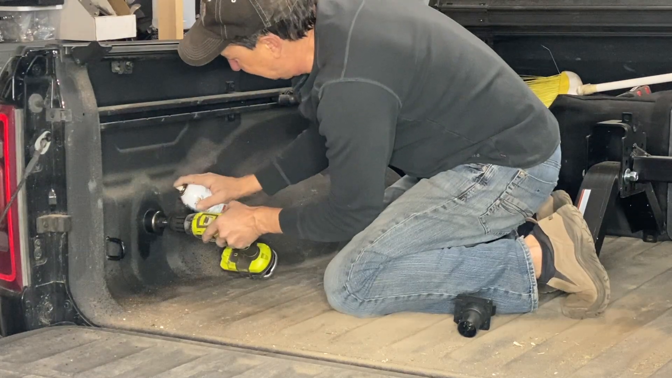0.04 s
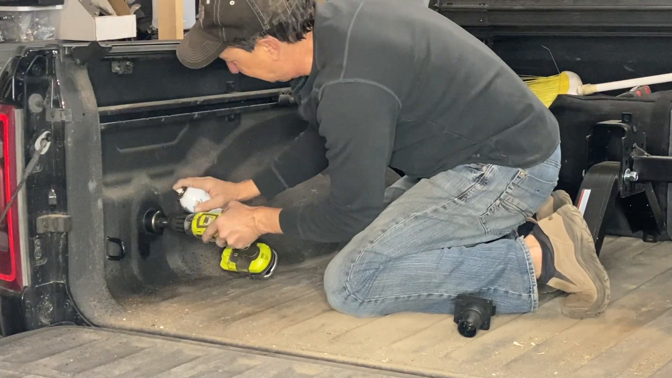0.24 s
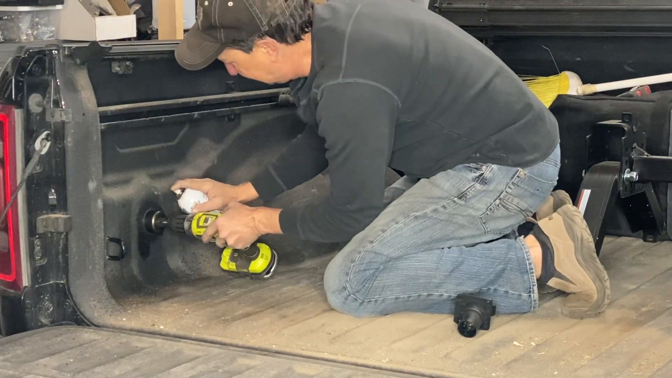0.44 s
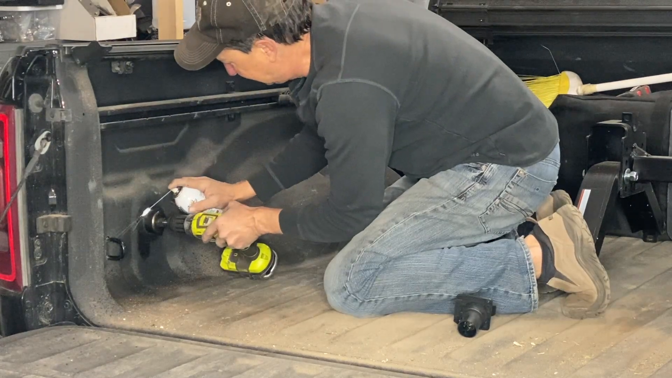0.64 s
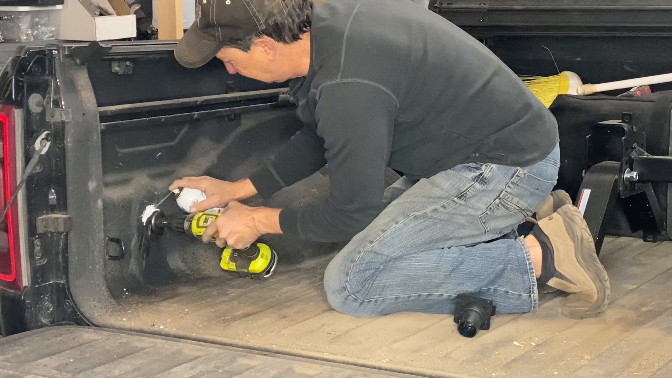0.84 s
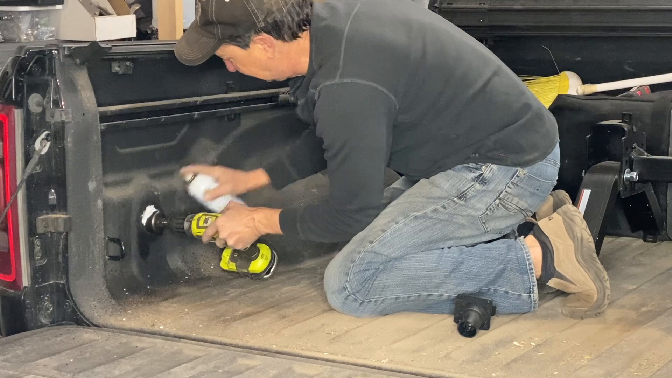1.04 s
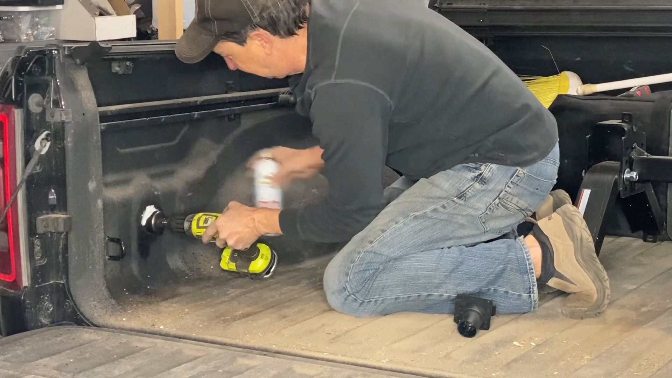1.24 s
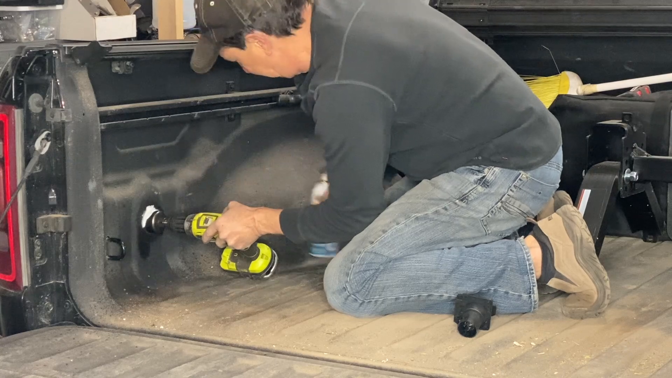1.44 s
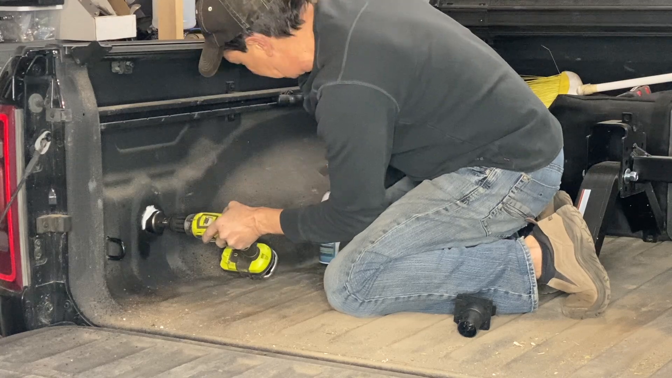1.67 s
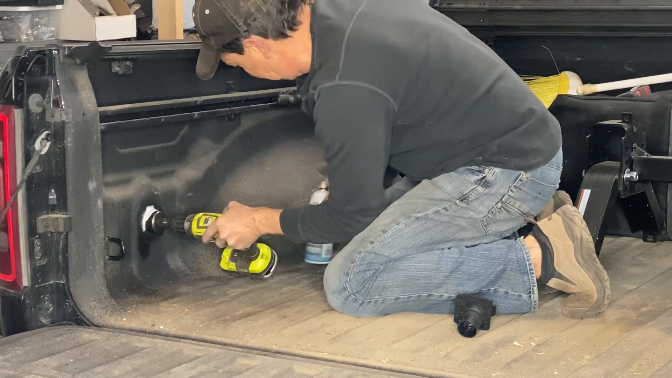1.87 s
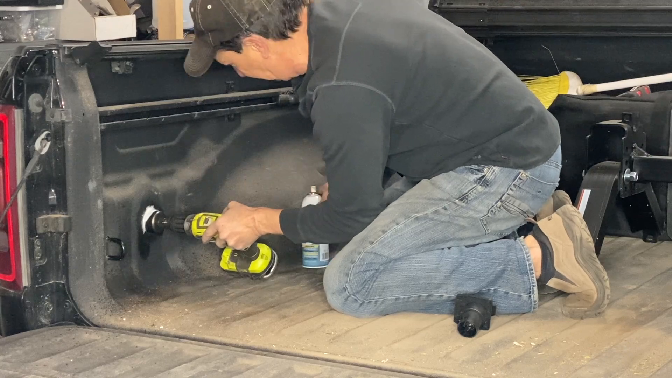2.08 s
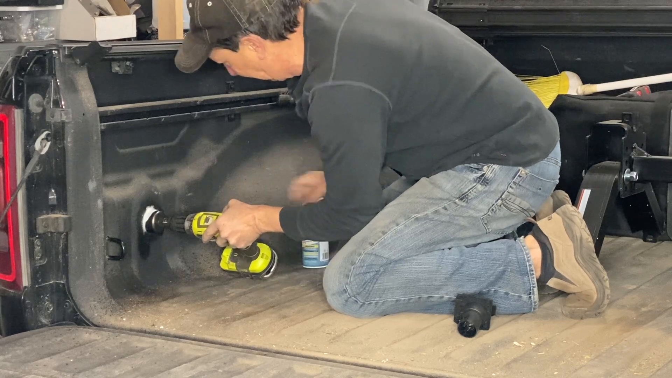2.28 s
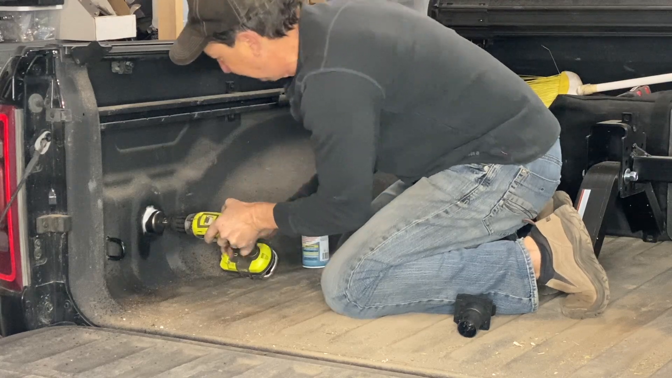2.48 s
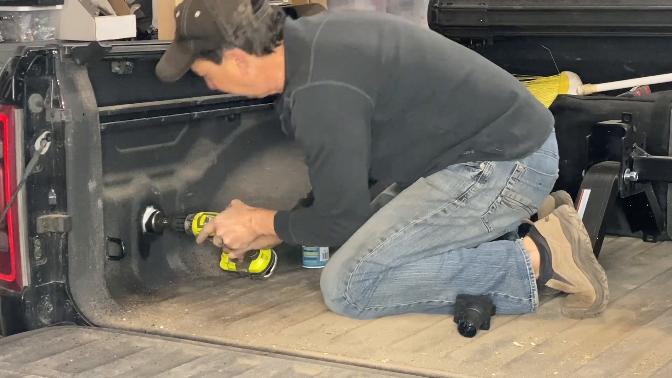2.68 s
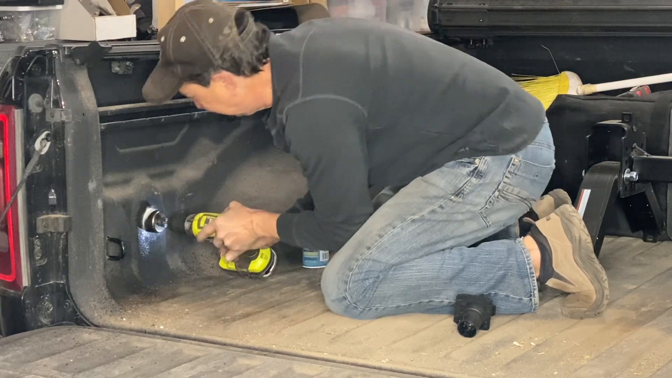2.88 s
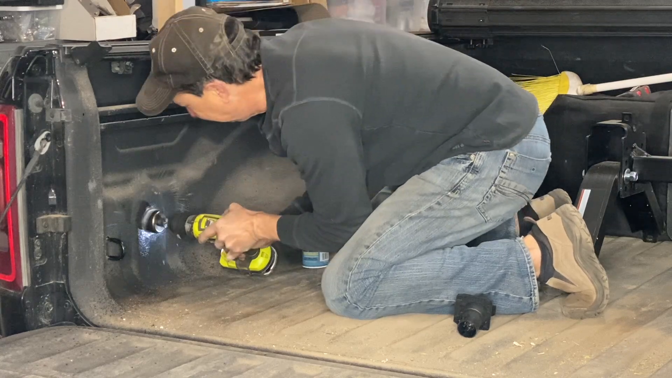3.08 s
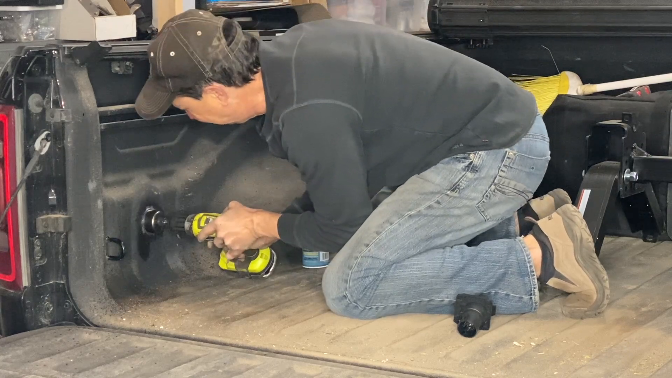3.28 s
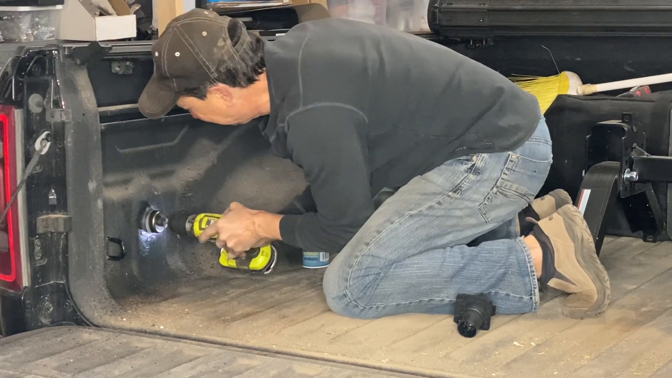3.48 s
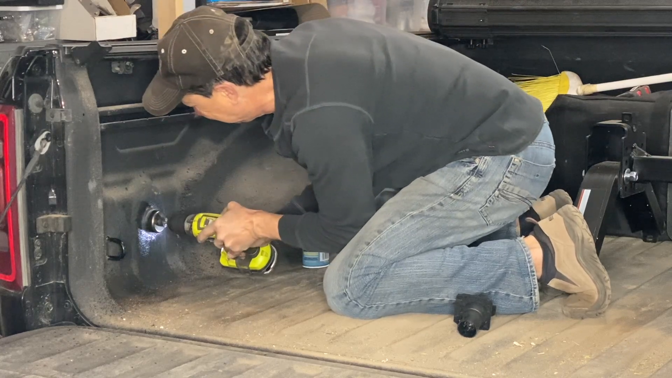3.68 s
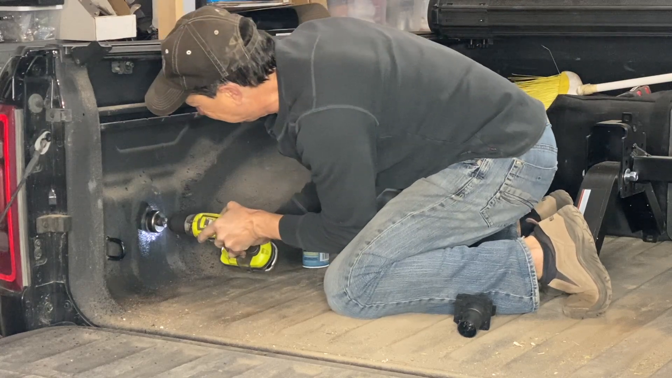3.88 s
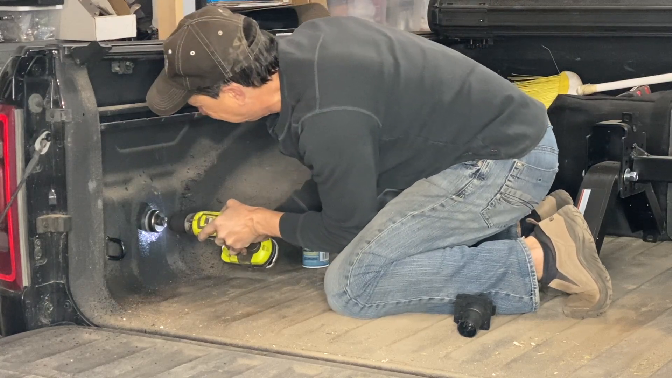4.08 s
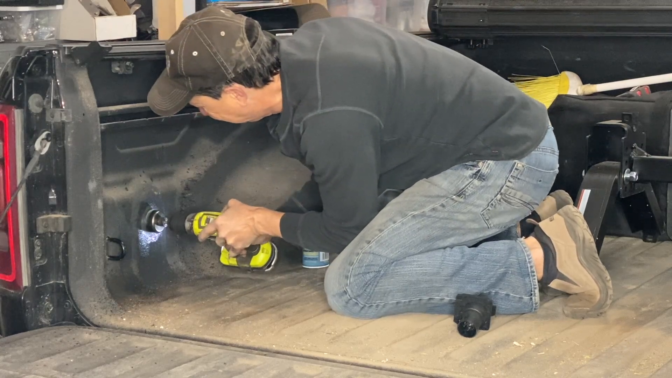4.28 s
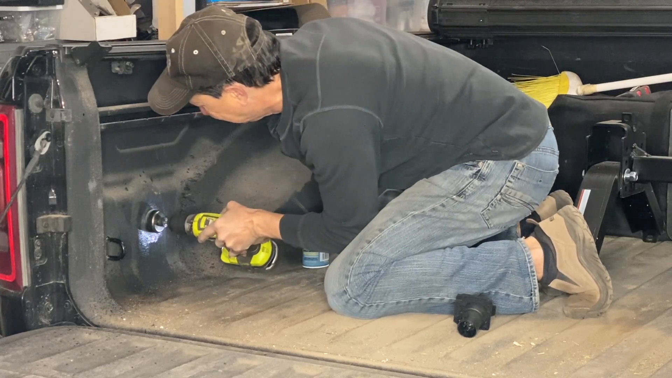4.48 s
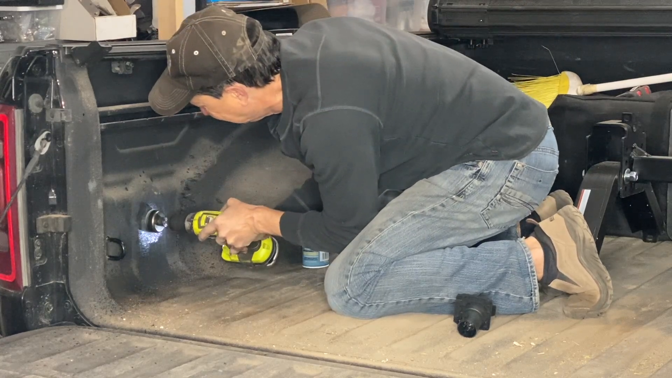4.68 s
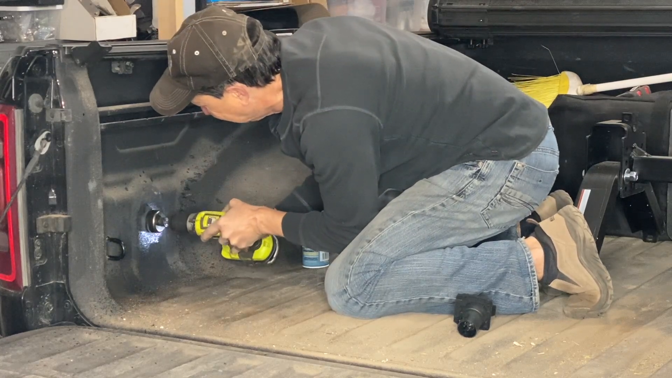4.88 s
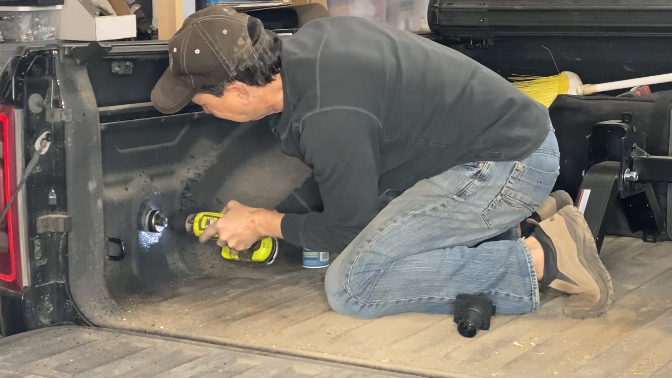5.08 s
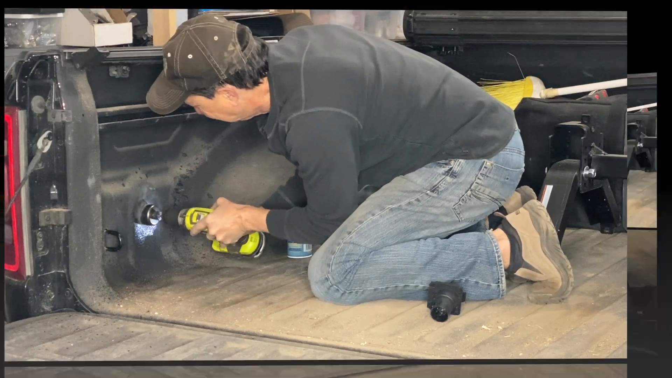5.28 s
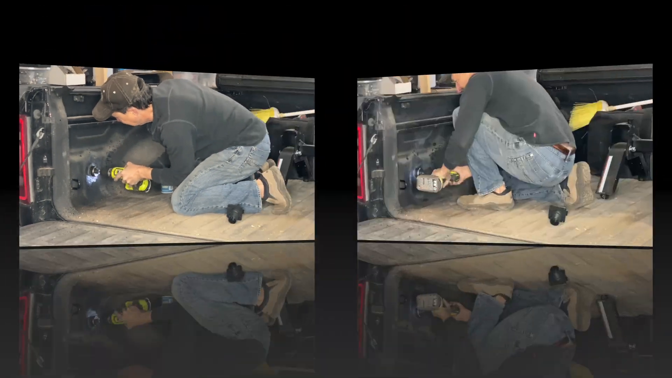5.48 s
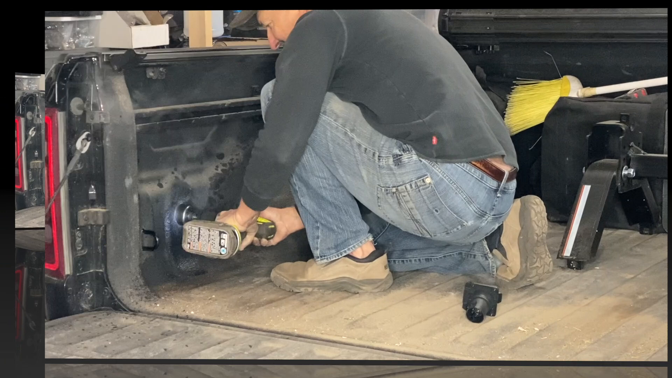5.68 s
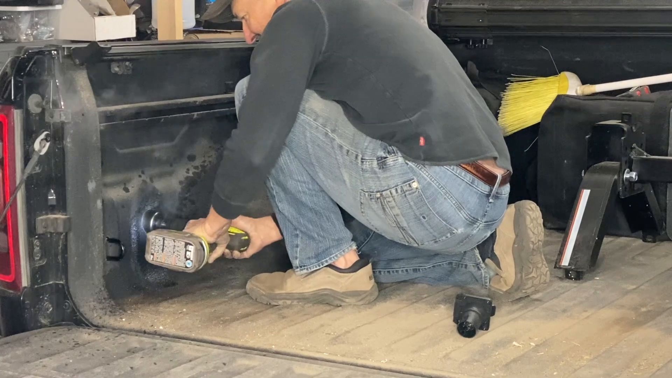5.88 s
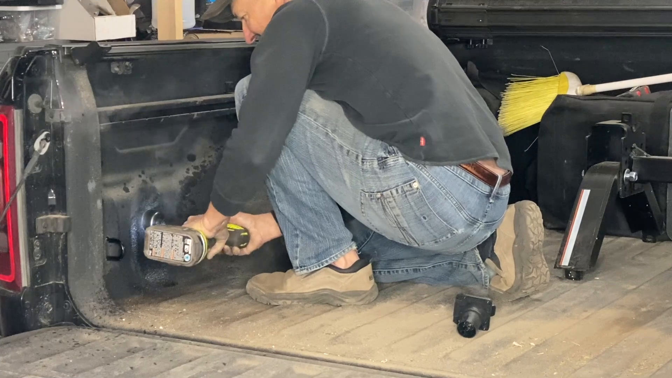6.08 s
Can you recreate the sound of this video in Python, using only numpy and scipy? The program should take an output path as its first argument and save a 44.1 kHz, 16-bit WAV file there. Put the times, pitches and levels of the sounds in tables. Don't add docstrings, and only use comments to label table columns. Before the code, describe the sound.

In a garage, someone kneeling in a pickup bed shifts with dull thumps, gives one bright spray burst, and sets the can down with a hollow metallic clunk. Cloth rustles, a knock follows, then a drill-driven hole saw bites steel close to the microphone, rasping, booming and ringing, with one brief let-off. The cut continues unevenly, then changes abruptly to a brighter, steadier buzzing howl.

```python
import sys
import numpy as np
from scipy import signal
from scipy.fft import rfft, irfft, next_fast_len
from scipy.io import wavfile

SR = 44100
rng = np.random.default_rng(int(sys.argv[2]) if len(sys.argv) > 2 else 0)


def inscribe(sig):
    pcm = np.round(np.clip(np.atleast_2d(sig).T, -1, 1) * 32767)
    wavfile.write(sys.argv[1], SR, pcm.astype(np.int16))


def voltage_ratio(level):
    return 10 ** (np.asarray(level, float) / 20)


N = 270333
SIZE = next_fast_len(N + SR)
HZ = np.maximum(np.fft.rfftfreq(SIZE, 1 / SR), 1)
TIME = np.arange(N) / SR
DISSOLVE_S, DISSOLVE_LENGTH_S = 5.6, 0.11


def rms_one(x):
    return x / np.sqrt(np.mean(x ** 2) + 1e-20)


def in_time(rows):
    s, *columns = np.transpose(rows)
    return [np.interp(TIME, s, c) for c in columns]


def at_hz(points, hz=HZ):
    point_hz, value = np.transpose(points)
    return np.interp(np.log(hz), np.log(np.maximum(point_hz, 1)), value)


def through(x, response):
    return irfft(rfft(x, SIZE) * response, SIZE)[..., :N]


def without(x, bands):
    gains = [1 - .5 * (np.tanh((HZ - low) / 20) - np.tanh((HZ - high) / 20)) for low, high in bands]
    return through(x, np.prod(gains, axis=0))


def modes(table):
    return sum((-1) ** k * voltage_ratio(db) / (1 + 1j * (HZ - hz ** 2 / HZ) / width)
               for k, (hz, width, db) in enumerate(table))


def drift(rate_hz):
    return rms_one(through(rng.standard_normal(N), 1 / (1 + 1j * HZ / rate_hz) ** 2))


def grit(per_s, spread_db):
    sizes = voltage_ratio(spread_db * np.minimum(rng.exponential(1, N), 5)) * rng.choice([-1, 1], N)
    return sizes * (rng.random(N) < per_s / SR)


def held(rows, rise_db_per_s, fall_db_per_s):
    s, length, db = np.transpose(rows)[..., None]
    swell_db = rise_db_per_s * np.maximum(s - TIME, 0)
    decay_db = fall_db_per_s * np.maximum(TIME - s - length, 0)
    return voltage_ratio(db - swell_db - decay_db).sum(axis=0)


def ramp(s, length):
    return np.clip((TIME - s) / length, 0, 1)


def peaks(rows):
    return np.max([np.interp(TIME, [s - build, s, s + let_go], [0, db, 0])
                   for s, db, build, let_go in rows], axis=0)


def garage_air():
    # start_s, level_db
    shifts = [
        (0.0, -73.5),
        (1.3, -70.5),
        (1.55, -74),
        (1.87, -64),
        (2.23, -75),
        (2.52, -65.5),
        (2.86, -62),
    ]
    # frequency_hz, density_db
    rumble_spectrum = [(12, -64), (20, -32), (37, -39), (60, -9), (125, 0), (147, -9.5), (252, -9),
                       (500, -23), (650, -58), (1100, -120)]
    # frequency_hz, level_db
    hum_tones = [(59.2, -76.5), (118.4, -76.5)]
    # frequency_hz, density_db
    hiss_spectrum = [(180, -9), (300, -6), (645, -14), (1100, -23), (3290, -30), (3640, -30), (7570, -35),
                     (11100, -34), (12500, -38), (16000, -42)]
    rumble = rms_one(through(rng.standard_normal(N), voltage_ratio(at_hz(rumble_spectrum))))
    rumble = rumble * voltage_ratio(in_time(shifts)[0] + 2.7 * drift(2.0))
    hum = sum(voltage_ratio(db - 1.0 + 4.8 * drift(7.7)) * np.sin(2 * np.pi * hz * TIME) for hz, db in hum_tones)
    hiss = through(rng.standard_normal(N), voltage_ratio(at_hz(hiss_spectrum)) / (1 + (HZ / 12500) ** 12))
    return rumble + hum + voltage_ratio(-80) * rms_one(hiss)


def rustle():
    # start_s, length_s, level_db
    rubs = [(0.0, .01, -78), (.12, .1, -87), (.418, .002, -83), (1.02, 0.027, -82), (1.08, .19, -84),
            (1.31, .002, -87), (1.574, .002, -90), (1.782, 0.17, -89), (2.3, .07, -76),
            (2.385, 0.15, -68.5), (2.57, 0.093, -73), (2.68, 0.074, -69.5), (2.79, .05, -70)]
    # frequency_hz, density_db
    cloth_spectrum = [(240, -31), (400, 1), (628, -13), (706, -11), (1110, -10), (2580, -11), (3400, -15),
                      (10900, -25.5), (13000, -30)]
    cloth = through(grit(6000, 2.8) * voltage_ratio(1.0 * drift(30.0)), voltage_ratio(at_hz(cloth_spectrum)))
    return held(rubs, 900, 500) * rms_one(cloth)


def creak():
    # start_s, length_s, level_db
    slips = [
        (0.0, .03, -83),
        (.136, .01, -82),
        (.2, .05, -92),
        (.326, .05, -90),
        (1.1, 0.025, -81.5),
        (1.158, .04, -86),
        (1.78, .085, -85),
        (1.91, .002, -77),
    ]
    # frequency_hz, width_hz, level_db
    seam_modes = [(2250, 120, -3), (870, 160, 5.5), (1630, 73, -12), (2950, 120, -14)]
    return held(slips, 200, 180) * rms_one(through(grit(600, 1.9), modes(seam_modes)))


def knocks():
    # start_s, peak_db, centre_hz,
    # fall_above_db_per_octave, damping_factor
    knock_events = [(.009, -56, 70, -10, 5), (.239, -55, 70, -8.5, 5.3), (.384, -52, 110, -14, 5.6),
                    (.9, -64, 170, -8, 2.8), (1.087, -82, 9000, -3, 2), (1.107, -85, 5000, -1, 2),
                    (1.657, -47, 400, -30, 1.7), (1.706, -48.5, 280, -15.5, 1.1),
                    (.548, -83, 6000, -3, 3.3), (1.929, -36, 265, -7, .75),
                    (1.94, -59.5, 1890, -12.5, 0.59), (1.662, -52.5, 160, -13, 1.4),
                    (2.754, -51, 122, -5.5, 2.1), (2.853, -39, 198, -5, 0.47)]
    # frequency_hz, width_hz, level_db (level unused: all stand out alike)
    bed_modes = [(833, 17, 0), (1030, 16, -3), (1300, 40, -2), (1400, 16, -7), (1680, 11, -11),
                 (1860, 35, -10), (2140, 34, -13), (2400, 71, -15), (2750, 15, -19)]
    # frequency_hz, t60_s
    bed_t60 = [(60, 0.67), (250, 0.4), (1000, 0.37), (4000, 0.29), (10000, 0.036)]
    bed = 1 + sum(1.8 * np.abs(modes([(hz, width, 0)])) for hz, width, _ in bed_modes)
    white = through(rng.standard_normal((2, N)), bed)
    out = np.zeros(N)
    second = TIME[:SR]
    for k, hz in enumerate(70 * 2 ** np.arange(0, 7.5, .5)):
        band_pass = signal.butter(4, [hz / 2 ** 0.2, hz * 2 ** 0.25], "band", fs=SR, output="sos")
        band = rms_one(signal.sosfilt(band_pass, white[k % 2]))
        for s, db, centre_hz, fall_db, damping in knock_events:
            at = round(s * SR)
            octaves = np.log2(hz / centre_hz)
            age = second * damping / at_hz(bed_t60, hz)
            decay = voltage_ratio(-60 * age) + voltage_ratio(-18.0 - 40 * age)
            onset = 1 - np.exp(-second * hz / 2.1)
            band_db = db + min(fall_db * octaves, 7 * octaves)
            out[at:at + SR] += voltage_ratio(band_db) * decay * onset * band[at:at + SR]
    return out


def spray():
    # start_s, length_s, level_db
    bursts = [
        (.585, 0.27, -50),
    ]
    # frequency_hz, density_db
    jet_spectrum = [(760, -12), (1300, -21), (2270, -8), (3080, -3), (7130, -1.5), (8400, -2.5),
                    (11000, 2.5), (12500, -3), (15500, -3.5)]
    # start_s, length_s, level_db
    spits = [
        (.62, .01, -56.5),
        (.66, 0.16, -68.5),
        (.86, .004, -59.5),
    ]
    # frequency_hz, width_hz, level_db
    nozzle_modes = [(810, 44, -2), (1090, 57, 6), (1320, 94, 3.5), (1750, 340, -3)]
    jet = through(rng.standard_normal(N) * voltage_ratio(1.2 * drift(25.0)), voltage_ratio(at_hz(jet_spectrum)))
    sputter = through(grit(1800, 3.3), modes(nozzle_modes))
    opened = TIME > .546
    return held(bursts, 600, 200) * opened * rms_one(jet) + held(spits, 500, 204) * rms_one(sputter)


def can():
    # frequency_hz, width_hz, level_db
    struck_modes = [(195.6, 4.7, -1.5), (322, 7.6, -2.5), (815, 5.1, -23), (850, 3.3, -17),
                    (1034, 9.3, -9.5), (1270, 8.7, -13), (1480, 8.3, -17.5), (1890, 12, -16),
                    (2070, 10, -21), (2440, 20, -22), (2710, 15, -29)]
    landing_s, landing_db = 1.931, -32.5
    hz, width, db = np.transpose(struck_modes)[..., None]
    age = np.maximum(TIME - landing_s, 0)
    rings = voltage_ratio(landing_db + db) * np.exp(-np.pi * width * age) * np.sin(2 * np.pi * hz * age)
    return np.sum(rings, axis=0)


def cut_gains():
    # start_s, bite_db (against steady cutting)
    bite_curve = [(2.84, -46), (2.86, -12), (2.93, -12), (3.03, 4.5), (3.14, -0.3), (3.15, -70),
                  (3.33, -38), (3.365, -18), (3.43, -1), (3.65, 3), (4.3, -0.5), (4.64, 4), (4.82, 0),
                  (5.04, -2), (5.1, 3.5), (5.3, 2), (5.6, 0.3), (6.13, -0.5)]
    # peak_s, strength_db, build_up_s, let_go_s
    grabs = [(2.87, 11, 0.015, 0.055), (3.06, 8, 0.095, 0.16), (3.49, 12, 0.077, 0.19),
             (3.86, 12, 0.27, 0.044), (4.28, 4.5, 0.32, 0.058), (4.37, 11.5, 0.055, 0.21),
             (4.69, 8.5, 0.041, 0.069), (4.82, 7, 0.15, 0.073), (4.99, 14.5, 0.064, 0.083),
             (5.3, 8.5, 0.53, 0.088), (5.39, 8, .03, 0.098), (5.61, 4.5, .04, 0.049)]
    # peak_s, strength_db, build_up_s, let_go_s
    singing = [
        (3.12, 5, 0.18, 0.055),
        (3.65, 4.5, 0.29, 0.28),
        (4.42, 2.5, 0.092, 0.09),
        (4.82, 4, 0.066, .15),
        (4.94, 6.5, 0.074, .04),
        (5.55, 3, 0.05, .03),
    ]
    # wall_boom, wall_ring, chip_rasp, fine_rasp
    # level in steady cutting [dB]
    steady_db = [-38, -29.5, -32, -36]
    follows_light = [0.82, 0.99, 0.98, 1.25]
    follows_hard = [0.2, -0.14, 1.08, 1.05]
    follows_grab = [0.98, 0.046, -0.091, -0.19]
    follows_singing = [0.11, 1.05, -0.059, 0.027]
    stall_db = [0, 1.5, -1.5, -10]
    later_cut_db = [-3.5, 2.5, 5.5, 0.2]
    ring_out_db_per_s = [104, 126.6, 140, 280]
    stall_s, stall_length_s = 4.99, 0.063

    bite, = in_time(bite_curve)
    stall = np.exp(-((TIME - stall_s) / stall_length_s) ** 2)
    later = ramp(DISSOLVE_S, DISSOLVE_LENGTH_S)
    causes = [np.minimum(bite, 0), np.maximum(bite, 0), peaks(grabs), peaks(singing), stall, later]
    shares = follows_light, follows_hard, follows_grab, follows_singing, stall_db, later_cut_db
    db = np.c_[steady_db] + np.transpose(shares) @ causes
    ring_out = np.c_[ring_out_db_per_s] * TIME
    return voltage_ratio(np.maximum.accumulate(db + ring_out, axis=1) - ring_out) * (TIME > bite_curve[0][0])


def saw():
    # frequency_hz, width_hz, level_db
    boom_modes = [(63.5, 6.3, -20), (99, 25, -9.5), (118, 20.7, -3), (174, 45, -8.5), (205.4, 21.3, -2),
                  (237.1, 11.3, 4)]
    ring_modes = [(343.5, 33, 1), (400, 47, -0.5), (458.6, 35, 3), (541, 90, -2), (613, 20, 4),
                  (654.5, 15.5, 0), (708.5, 19, -0.5), (798, 28, -4.5), (882, 15.5, -1.5), (946, 9.3, -3.5),
                  (1031, 11, -10), (1117, 12, -13), (1318, 28, -19)]
    # frequency_hz, width_hz, level_db
    cup_modes = [(1450, 15, 11.7), (1910, 29, 2.9), (2100, 18, 6.9), (2450, 44, 5.3), (2780, 45, 4.7),
                 (3510, 41, 1.7), (3580, 190, 3.4)]
    # frequency_hz, density_db
    rasp_spectrum = [(600, -34), (1000, 4.5), (1230, -7.5), (1500, -6.5), (2800, -4.5), (4000, -8),
                     (6000, -8.5), (7800, -12.5), (8700, -16), (11000, -13.5), (13000, -19), (15500, -24)]
    wobble = drift(7.1)
    boom = through(grit(900, 3.5), modes(boom_modes) / (1 + (56 / HZ) ** 8))
    chips = grit(2500, 1.82) * voltage_ratio(0.96 * wobble)
    ring = sum(voltage_ratio(4.2 * drift(3.45)) * through(chips, modes([mode])) for mode in ring_modes)
    cup = 1 + sum(np.abs(modes([(hz, width, 0)])) * (voltage_ratio(db) - 1) for hz, width, db in cup_modes)
    fine_chips = grit(9000, 1.0) * voltage_ratio(0.47 * wobble + 0.26 * drift(42.0))
    sides = rms_one(rng.standard_normal((7, N)) * voltage_ratio(-60 * TIME / 0.055)) / np.sqrt(N)
    turns = np.array([drift(10) for _ in sides])
    turns = turns / np.sqrt(np.sum(turns ** 2, axis=0))
    glints = through(fine_chips * turns, rfft(sides, SIZE)).sum(axis=0)
    rasp = through(2 * fine_chips + glints, voltage_ratio(at_hz(rasp_spectrum)) * cup)
    treble = through(rasp, 1 / (1 + (6000 / HZ) ** 12))
    voices = boom, ring, rasp - treble, treble
    return sum(gain * rms_one(x) for gain, x in zip(cut_gains(), voices))


def chatter(swell_db=3.0):
    # start_s, teeth_per_s, level_db
    teeth = [(4.25, 480, -45), (4.5, 522, -30.5), (4.7, 470, -40), (4.78, 364, -37), (4.86, 370, -24.5),
             (4.94, 333, -31.5), (5.09, 373, -41.5), (5.18, 435, -26.5), (5.33, 411, -27), (5.43, 390, -45),
             (5.48, 336, -43), (5.56, 333, -25), (5.66, 332, -33), (5.82, 344, -22.5), (5.87, 339, -28.5),
             (5.95, 326, -15.5), (6.03, 336, -21), (6.13, 327, -16.5)]
    # frequency_hz, width_hz, level_db
    fed_modes = [(1242, 98, 3), (2360, 32, 11.5)]
    per_s, level_db = in_time(teeth)
    locked = ramp(5.4, .12)
    later = ramp(DISSOLVE_S, DISSOLVE_LENGTH_S)
    free_slip, locked_slip = .14, .06
    slip = free_slip + (locked_slip - free_slip) * locked
    early_fall_db, later_fall_db = -22.5, -7
    fall_db = early_fall_db + (later_fall_db - early_fall_db) * later
    mode_hz, mode_width_hz = 735, 71
    off_mode_db = 10 * np.log10(1 + ((2 * per_s - mode_hz) / mode_width_hz) ** 2)
    second_db = -26.5 + 2.5 * later - off_mode_db + .15 * (level_db + 28) - level_db
    turns = np.cumsum(per_s * (1 + .012 * drift(45.0))) / SR
    stack = np.zeros(N)
    for k in range(1, 11):
        harmonic_db = second_db * (k > 1) + fall_db * np.log2(max(k / 2, 1)) + swell_db * drift(17.0)
        phase = 2 * np.pi * (k * turns + slip * k * drift(26.5))
        stack += voltage_ratio(harmonic_db) * np.sin(phase)
    return voltage_ratio(level_db) * (TIME > teeth[0][0]) * through(stack, 1 + modes(fed_modes))


def scene():
    # frequency_hz, left_lead_rad
    port_lead = [(1, 0), (2500, 0), (3200, .14), (4000, 0), (7950, 0), (8100, 1.7), (9300, 1.7), (10400, 0),
                 (11200, 0), (12900, -3.1), (14000, -3.2), (15200, -6.28)]
    # frequency_hz, level_db
    reflections = [(30, -22), (60, -16), (110, -13), (200, -14), (450, -10), (600, -4.5), (1250, -5),
                   (1600, -19), (2100, -45), (3200, -15), (4400, -19), (8300, -3.5), (9800, -5),
                   (10800, -28), (11900, -5), (14500, -5)]
    near = garage_air() + rustle() + creak() + knocks() + spray() + can() + saw() + chatter()
    garage_t60_s = .2
    tails = rng.standard_normal((2, SR // 2)) * voltage_ratio(-60 * TIME[:SR // 2] / garage_t60_s)
    tails = rms_one(tails) / np.sqrt(SR // 2)
    sides, around = rfft(tails, SIZE) * voltage_ratio(at_hz(reflections))
    left_right = np.array([[1], [-1]])
    ports = np.exp(.5j * at_hz(port_lead) * left_right)
    return through(near, ports + sides * left_right + 0.78 * around / (1 + (6000 / HZ) ** 8))


def band_limit(x):
    return signal.sosfilt(signal.butter(12, 17100, fs=SR, output="sos"), x)


def record(dry):
    # from_hz, to_hz
    no_mid = [(12950, 14000), (15780, SR)]
    no_side = [(4800, 8200), (15200, SR)]
    splice_s, splice_width_s = 2.557, .007
    left, right = dry * (1 - .7 * np.exp(-((TIME - splice_s) / splice_width_s) ** 2))
    mid = without((left + right) / 2, no_mid)
    side = without((left - right) / 2, no_side)
    return band_limit(np.array([mid + side, mid - side]))


dry = scene()
out = record(dry)
inscribe(out)
```